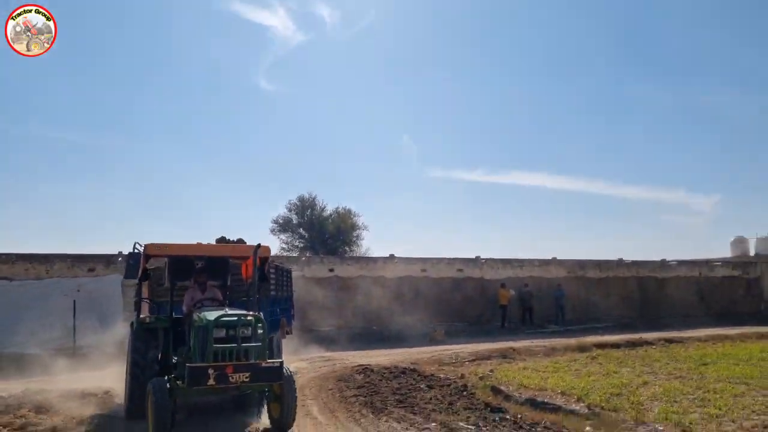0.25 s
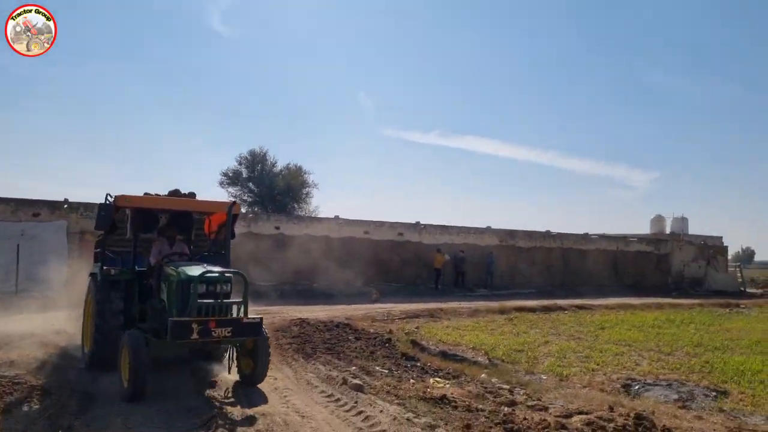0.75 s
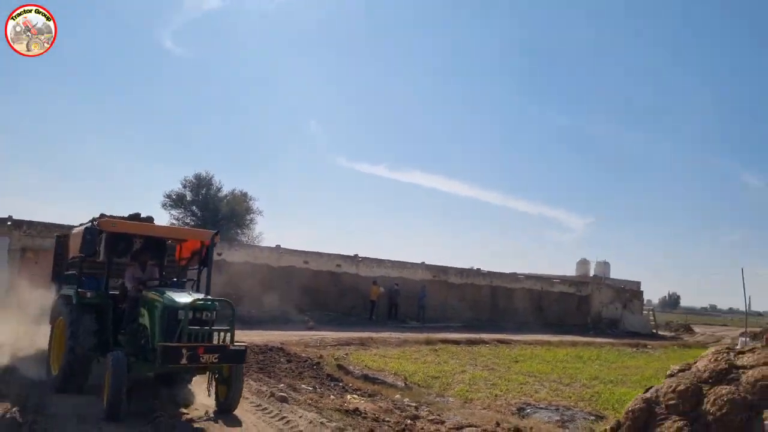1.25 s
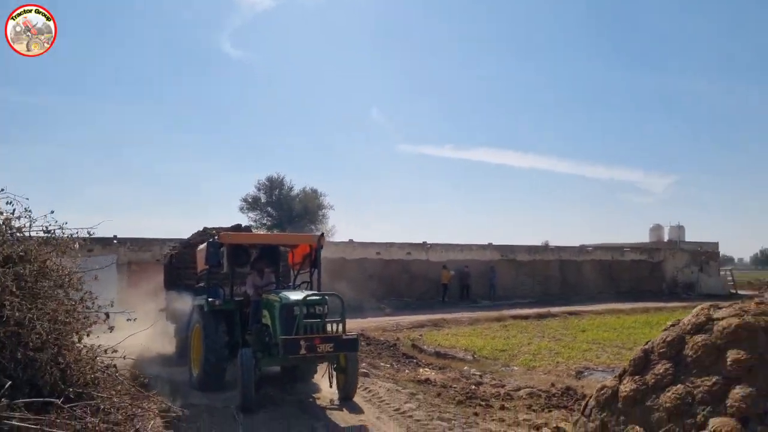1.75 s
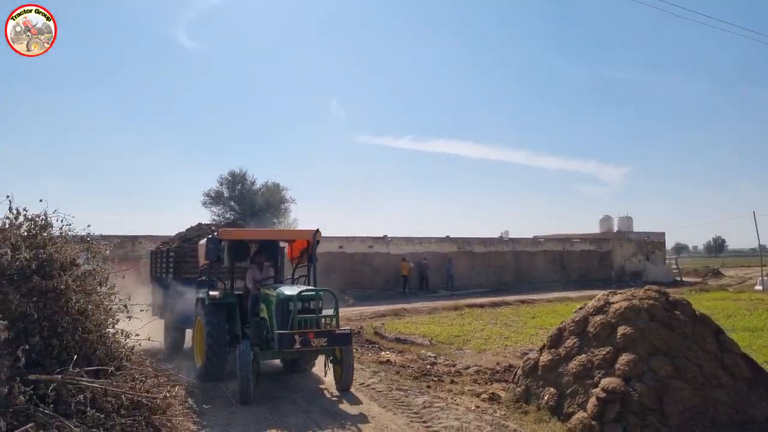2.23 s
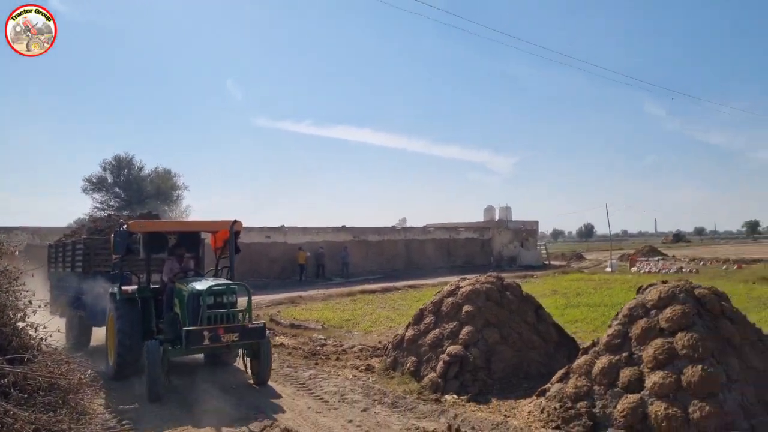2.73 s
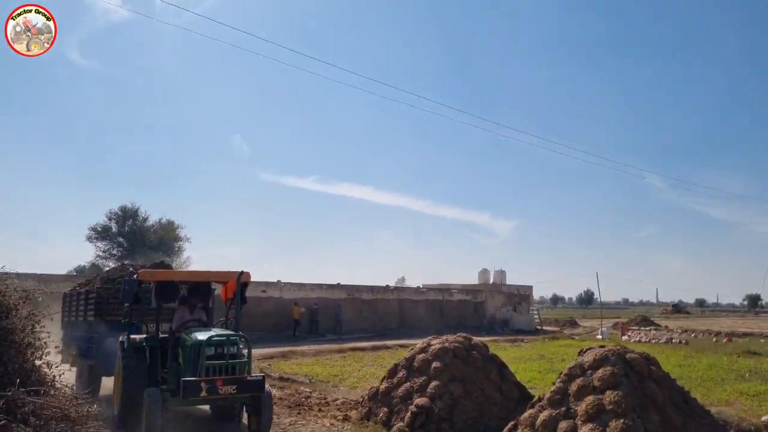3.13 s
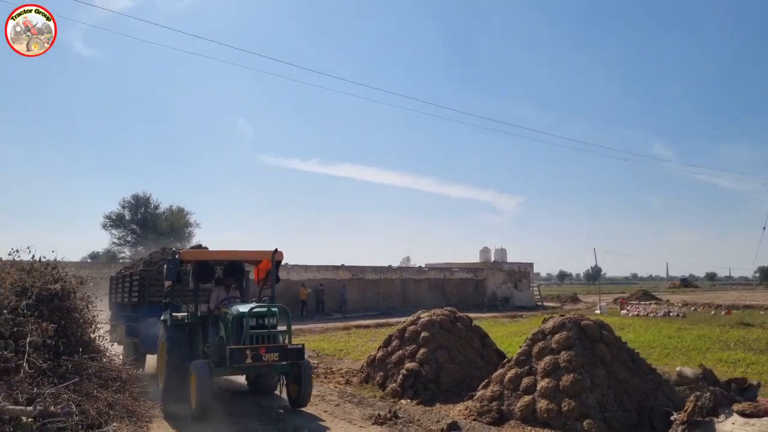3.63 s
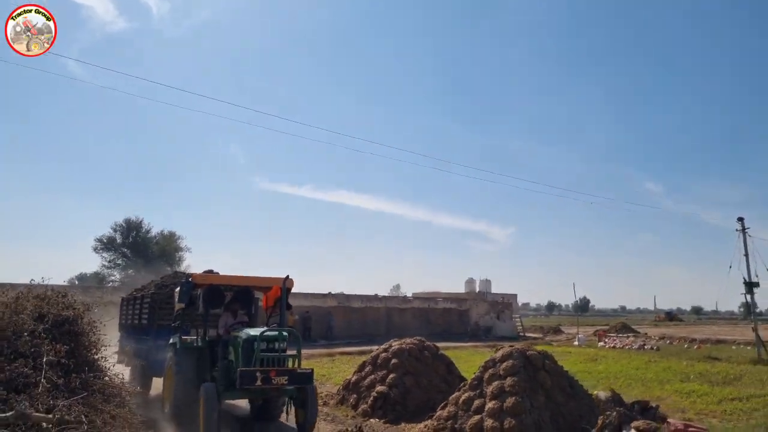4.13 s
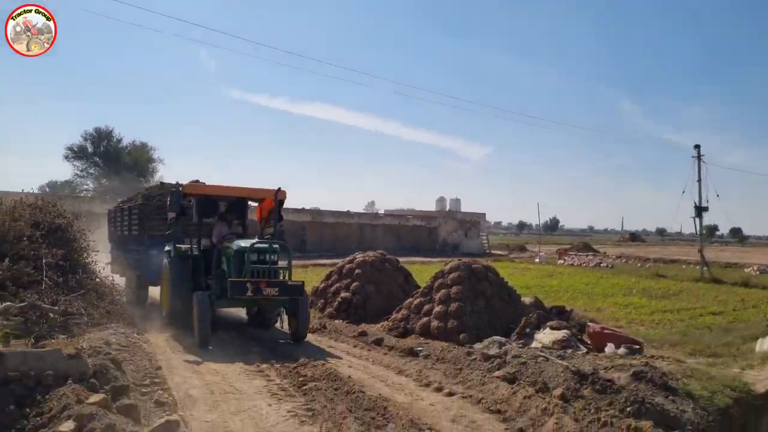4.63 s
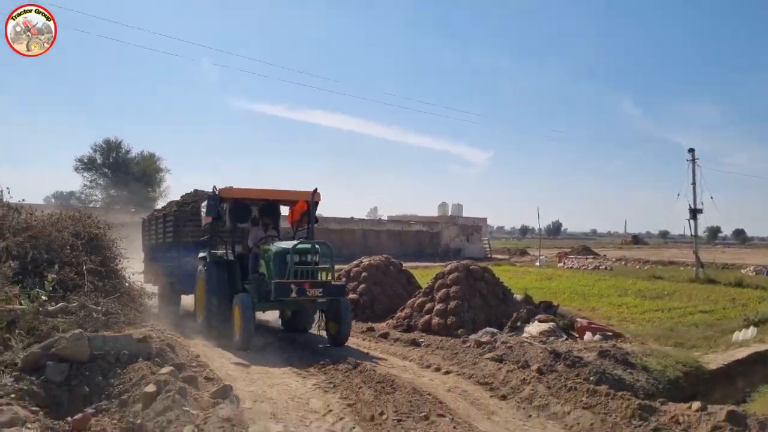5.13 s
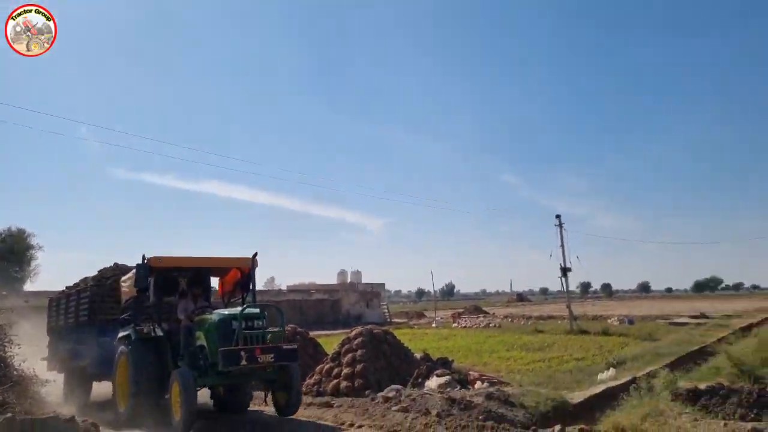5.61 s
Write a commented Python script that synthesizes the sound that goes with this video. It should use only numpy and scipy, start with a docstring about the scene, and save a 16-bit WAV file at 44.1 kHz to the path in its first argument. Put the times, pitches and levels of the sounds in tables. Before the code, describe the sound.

Continuous tractor engine outdoors, dominated by a deep uneven drone of about fifty firings a second. Metallic clatter and short pings ride on top, above a constant fan and tyre rush. Two soft trolley thuds come early, and one faint steel tick near four seconds. The exhaust colour shifts midway as the tractor turns. Handheld stereo pickup, slightly swaying, no marked echo.

```python
"""On a dirt track outdoors, a three-cylinder diesel tractor hauls a heavy trolley past a hand-held microphone.
Each firing thumps from the stack (summed sines), barks in the pipe and knocks the block (resonances shaken
by noise bursts) and pings (fading sines). The revs sag and recover under the load.
Shaped noise makes the rumble, fan, bumps, ticks and breeze.
The microphone has two ports; the hand sways, so the time lag between them drifts."""
import sys
import numpy as np
from scipy import signal
from scipy.fft import rfft, irfft, next_fast_len
from scipy.io import wavfile
from scipy.ndimage import map_coordinates

SR = 44100
rng = np.random.default_rng(int(sys.argv[2]) if len(sys.argv) > 2 else 0)


def put_to_file(sound):
    """Save the sound as 16-bit audio at rate SR, in the file named by the first command-line argument."""
    columns = np.atleast_2d(sound).T  # one column per channel
    safe = np.clip(columns, -1, 1)
    whole_steps = np.round(safe * 32767)
    wavfile.write(sys.argv[1], SR, whole_steps.astype(np.int16))


def magnitude_from_level(level_db):
    """Linear magnitude for a level in decibels (20 dB per decade)."""
    exponent = np.asarray(level_db, float) / 20
    return 10 ** exponent


N = 258867
T = np.arange(N) / SR  # time in seconds

# Engine speed. Each row: time in seconds, firings per second.
REVS = [(0, 49.68), (0.45, 48.67), (0.7, 47.27), (0.85, 47.88), (1.15, 49.56), (1.3, 49.57), (1.48, 51.22),
        (2.05, 51.35), (2.65, 53.36), (2.9, 52.86), (3.15, 54.38), (3.35, 54.29), (3.54, 55.88),
        (3.95, 54.58), (4.17, 52.54), (4.43, 53.47), (4.68, 52.56), (4.95, 53.7), (5.27, 53.93),
        (5.45, 51.72), (5.65, 53.67), (5.87, 50.53)]
# Unequal cylinders. Each row: swings per full engine cycle, timing swing in radians, size swing in dB.
UNEVEN = [(1, 0.079, -0.12), (2, 0.059, 0.08)]
# How the three cylinders differ. Each row: bark in relative dB, knock in relative dB.
CYLINDERS = [(-3, 1.5), (3.5, 3), (0.5, -0.5)]
# Odd firings, weaker or stronger. Each row: time in seconds, change in dB.
ODD_FIRINGS = [(.81, -2), (3.28, 1), (4.163, 1), (4.585, 1), (5.16, -2)]
# Levels of the firing tone and its second to fourth orders. Each row: time in seconds, level in dB.
ORDER_1 = [(0.0, -19.9), (0.18, -23.3), (0.9, -23.1), (1.74, -21.1), (2.28, -22.1), (2.4, -20.0),
           (2.64, -19.9), (3.3, -20.3), (4.02, -22.6), (4.14, -24.2), (4.26, -21.9), (5.87, -21.3)]
ORDER_2 = [(0.0, -15.5), (0.3, -14.3), (0.78, -16.5), (1.14, -16.5), (1.32, -14.5), (1.5, -18.5),
           (1.86, -14.5), (2.22, -17), (2.82, -15), (3.66, -17), (3.96, -16), (4.44, -14.5), (5.04, -17.5),
           (5.87, -16.1)]
ORDER_3 = [(0.0, -17), (0.18, -25), (0.3, -25.5), (0.54, -21.5), (1.5, -19.5), (1.68, -24.0), (1.92, -18.9),
           (2.58, -18), (2.7, -16.5), (3.12, -18), (3.66, -23.5), (3.78, -19.5), (4.02, -18), (4.2, -22),
           (4.8, -19.4), (5.87, -20.6)]
ORDER_4 = [(0.0, -37.1), (0.72, -31.5), (0.96, -29), (1.56, -44), (1.98, -38), (2.16, -43), (3.54, -34.5),
           (5.04, -36), (5.58, -47), (5.87, -44)]
# Lead of each firing order, one value an order, in radians.
AHEAD = [.62, 0, .3, 0]
# Resonances of the exhaust pipe. Each row: pitch in Hz, width in Hz, level in dB before the turn,
# change in dB over the turn, change in dB with the fullness.
PIPE = [(367.6, 105, -33.5, -6, -1), (443, 101, -37, -2, 1.5), (515.6, 180, -47, -3, 15),
        (692.3, 110, -42.5, 8, 1), (910, 126, -39.5, -7.5, 1), (1160, 234, -44, 2, 3),
        (1426, 176, -40.5, -4.5, -1)]
# The stack swings round towards the microphone. Each row: time in seconds, share from 0 to 1.
TURN = [(0, 0.1), (1.3, 0.13), (3.0, 0.29), (3.5, 0.9), (5.2, 0.99), (5.87, 0.6)]
# The middle of the bark, near 515 Hz, fills out and thins again. Each row: time in seconds, share from 0 to 1.
FULLNESS = [(0, 0), (.3, 0.4), (.55, 1), (1.0, 0.95), (1.25, 0.27), (1.9, 1), (3.1, 0.5), (3.7, 0),
            (4.6, 0.46), (5.87, 0.7)]
# Resonances of the engine block. Each row: pitch in Hz, width in Hz, level in dB.
BLOCK = [(2300, 180, -48), (3060, 124, -48), (3800, 330, -42), (4133, 180, -42), (4510, 680, -39.5),
         (7300, 1050, -48.5), (8750, 2100, -53)]
WANDER_DB = 0.4  # slow drift of each pipe and block resonance
# Tone of the metal spray. Each row: frequency in Hz, relative dB per Hz.
METAL = [(1200, -8), (2000, -8.5), (3300, -6), (3900, -5), (4800, -3.5), (5900, -12.5), (7400, -15),
         (8600, -17.5), (10000, -25.5), (12000, -23), (13500, -39), (16000, -41)]
# Loudness of the metal spray. Each row: time in seconds, level in dB.
LOAD = [(0, -32.5), (1.3, -33.5), (2.35, -33.5), (2.85, -31), (3.7, -33.5), (5.87, -32)]
# The hardest firings ring the block clearly. Each row: time in seconds, level in dB, pitch in Hz.
PINGS = [(0.4242, -15.5, 3680), (0.634, -14.5, 4720), (1.5304, -11.5, 3820), (1.5695, -13, 3870),
         (1.6502, -14, 3820), (1.765, -15, 3890), (1.8028, -18, 3980), (1.918, -18, 4020),
         (2.056, -17, 3980), (2.2684, -15, 4120), (2.668, -13, 4560), (3.027, -17, 3700),
         (3.138, -15, 3900), (3.2485, -18, 3830), (3.5224, -13, 3800), (4.013, -18, 3930),
         (4.0664, -20, 3870), (4.102, -19, 3800), (4.2355, -19, 3980), (4.334, -18, 3900),
         (4.4982, -15, 4080), (4.5206, -13, 3940), (4.6155, -15, 3920), (4.6336, -11, 3940),
         (4.692, -19, 3930), (4.8035, -20, 3940), (5.0056, -11.5, 4400), (5.083, -15, 3920),
         (5.3627, -15, 3890), (5.7613, -11.5, 3860)]
# Typical soft ping that every firing makes. Each row: time in seconds, level in dB.
SOFT = [(0, -26), (.7, -33), (1.3, -33), (1.55, -25), (2.4, -25), (2.8, -24), (3.8, -24), (5.87, -32)]
SOFT_SCATTER_DB, SOFT_HZ, SOFT_SPREAD_HZ = 2.5, 3830, 179  # how the soft pings differ; lowest pitch
# Tone of the gas roar and tyres. Each row: frequency in Hz, relative dB per Hz.
GAS = [(25, -25), (60, 4.5), (90, -5), (140, 5), (190, -2), (280, -12.5), (600, -8), (1000, -40.5)]
# Tone of the fan, gears and tyres. Each row: frequency in Hz, relative dB per Hz.
FAN = [(500, -12), (1000, 2.5), (1600, 0), (2300, -3.5), (3300, -3.5), (4400, -22.5), (5900, -19.5),
       (7400, -23.5), (10000, -29), (13500, -31), (16000, -44)]
# The trolley drops into ruts. Each row: time in seconds, level in dB.
BUMPS = [(.43, -27.5), (.62, -28)]
# Loose steel on the trolley. Each row: start in seconds, level in dB before filtering.
TICKS = [(3.989, -24.5)]
# Tone of the moving air. Each row: frequency in Hz, relative dB per Hz.
BREEZE = [(15, -43), (30, -18), (70, 1), (150, 10), (300, -29)]
# How the ports differ. Each row: frequency in Hz, lead of the left port in radians,
# left over right in dB, likeness of the sounds that scatter from 0 to 1.
PORTS = [(49.7, .02, 4, 0.5), (106, 0.044, 2, 0.9), (159, 0.091, 0, 0.86), (372, 0.098, 0, 0.86),
         (1090, 1.04, 0, 0.43), (1716, 2.6, 0, 0.81), (2044, 3.3, 4, 0.44), (2520, 6.2, 2.5, 0.95),
         (2830, 7.55, 4, 0.08), (3800, 7.51, -1.5, 0.8), (4930, 9.97, -9.5, 0.65), (5660, 11.33, -6, 1),
         (7800, 11.65, 7, 0.57), (8460, 12.1, -5, 0.7), (9680, 14, -13, 0.85), (10050, 13.6, -3.5, 0.75),
         (11600, 16.3, -7.5, 0.25), (13800, 18.7, 3, 0.5), (16000, 21.5, 2.2, .22)]
# Sway of the hand. Each row: time in seconds, extra lead of the left port in microseconds.
SWAY = [(0.0, -13.1), (0.54, 20.3), (1.26, 46), (1.62, -44), (1.92, -6), (2.34, -37), (2.52, 8.1),
        (2.88, 28), (3.0, -2), (3.24, 13), (4.02, -13.9), (4.2, -31), (4.5, 8.2), (5.28, -33), (5.52, -29),
        (5.64, 14), (5.76, -23), (5.87, -11)]


def unit(x):
    """Scale to rms 1."""
    return x / np.sqrt(np.mean(x ** 2) + 1e-20)


def curve(rows):
    """Read a table of (time, value) rows at every sample."""
    seconds, values = np.transpose(rows)
    return np.interp(T, seconds, values)


def along(points, hz, axis=1):
    """Read a column of (Hz, ..) points on a log axis."""
    points = np.asarray(points)
    return np.interp(np.log(hz + 1), np.log(points[:, 0] + 1), points[:, axis])


def wobble(rate):
    """A smooth random curve through rate points a second."""
    points = rng.standard_normal(int(T[-1] * rate) + 4)
    return map_coordinates(points, [T * rate])


def filtered(x, response):
    """Multiply the spectrum of x by a response of frequency."""
    m = next_fast_len(N + SR // 4)
    return irfft(rfft(x, m) * response(np.fft.rfftfreq(m, 1 / SR)), m)[..., :N]


def resonance(f, hz, width):
    """A resonance that rings only after it is struck, with peak gain 1."""
    return 1j * f * width / (hz * hz - f * f + 1j * f * width)


def burst(firings, early, rise_s, decay_s, rest_db, scatter_db, axis):
    """Envelope that swells at each firing and dies away; early is a share of the firing interval."""
    index = (firings + early).astype(int)
    scatter = scatter_db * rng.standard_normal(index[-1] + 1)[index]
    size = magnitude_from_level(np.array(CYLINDERS)[index % 3, axis] + scatter)
    since = T - np.maximum.accumulate(T * np.diff(index, prepend=index[0]))  # time since the firing
    return size * np.exp(-since / decay_s) * (1 - np.exp(-since / rise_s)) + magnitude_from_level(rest_db)


def rung(drive, hz, width):
    """A steep resonance shaken by a drive, rms 1."""
    return unit(filtered(drive, lambda f: resonance(f, hz, width) ** 2))


def hiss(envelope, spectrum):
    """Two unrelated noises under one envelope, rms 1."""
    noise = envelope * rng.standard_normal((2, N))
    return unit(filtered(noise, lambda f: magnitude_from_level(along(spectrum, f))))


def thump(firings):
    """The firing orders line up as one suction pulse; the first and third run slightly ahead."""
    angle = 2 * np.pi * firings
    size_db = 0.066 * wobble(30)  # no two firings are equal
    # cylinders firing early or late put weak lines between the orders
    for k, swing, swing_db in UNEVEN:
        cycle = k * firings * 2 * np.pi / 3
        swing_now = swing * magnitude_from_level(1.5 * wobble(3))
        angle = angle + swing_now * np.cos(cycle + 1.1 + 0.4 * wobble(2))
        size_db = size_db + swing_db * np.cos(cycle + 0.5 * wobble(1.28))
    for s, db in ODD_FIRINGS:  # the change centres on the nearest firing
        nearest = np.round(firings[round(s * SR)])
        size_db = size_db + db * np.exp(-((firings - nearest) / 0.26) ** 2)
    pulse = 0
    for k, order in enumerate((ORDER_1, ORDER_2, ORDER_3, ORDER_4), 1):
        level = magnitude_from_level(curve(order) + 0.42 * wobble(30))
        pulse = pulse - level * np.cos(k * angle + AHEAD[k - 1] + 0.11 * wobble(25))
    return np.sqrt(2) * magnitude_from_level(size_db) * pulse


def bark(firings):
    """Valves and gas repeat nearly the same flutter every full cycle, so the pipe sings on all its multiples."""
    pattern = rng.standard_normal((12, 256))  # slow change x crank angle
    crank = firings / 3 % 1 * pattern.shape[1]
    flutter = unit(map_coordinates(pattern, [T * 1.531, crank], mode="grid-wrap"))
    gate = burst(firings, early=0.3, rise_s=0.001, decay_s=0.006, rest_db=-13, scatter_db=1.5, axis=0)
    turbulence = magnitude_from_level(3.5) * rng.standard_normal((2, N))  # spreads over the whole band
    drive = gate * (flutter * [[1], [0.3]] + turbulence)
    turn, fullness = curve(TURN), curve(FULLNESS)
    out = 0
    for hz, width, db, turn_db, fullness_db in PIPE:
        level_db = db + turn_db * turn + fullness_db * fullness + WANDER_DB * wobble(2.465)
        out = out + magnitude_from_level(level_db) * rung(drive, hz, width)
    return out


def clatter(firings):
    """Combustion knock rings the block for a few milliseconds and shakes loose a spray of metal noise."""
    rings = 0
    for hz, width, db in BLOCK:
        knock = burst(firings, early=0.2, rise_s=0.0012, decay_s=0.0051, rest_db=-23, scatter_db=4.0, axis=1)
        ring = rung(knock * rng.standard_normal((2, N)), hz, width)
        rings = rings + magnitude_from_level(db + WANDER_DB * wobble(2.35)) * ring
    spray = burst(firings, early=0.21, rise_s=0.0012, decay_s=0.0093, rest_db=-4.5, scatter_db=1.9, axis=1)
    return rings + magnitude_from_level(curve(LOAD)) * hiss(spray, METAL)


def pings(firings):
    """Each knock swells for about a millisecond and rings out as a sine; every firing pings softly."""
    out = np.zeros((2, N + SR))
    t = T[:SR // 20]
    at = np.flatnonzero(np.diff(firings.astype(int)))
    size, pitch = rng.standard_normal((len(at), 2)).T
    soft_db = curve(SOFT)[at] + SOFT_SCATTER_DB * size
    soft_hz = SOFT_HZ + SOFT_SPREAD_HZ * pitch ** 2
    rows = [*np.transpose([T[at], soft_db, soft_hz]), *PINGS]
    phases = rng.uniform(0, 2 * np.pi, (len(rows), 2, 1))
    for (s, db, hz), phase in zip(rows, phases):
        envelope = magnitude_from_level(db - 60 * t / 0.025) * (1 - np.exp(-t / 0.0014))  # falls 60 dB in 25 ms
        ring = envelope * np.sin(2 * np.pi * hz * t + phase)
        out[:, round(s * SR):][:, :len(t)] += ring * [[1], [0.5]]
    return out[:, :N]


def rumble():
    """Gas roar and tyres, as shaped noise, fill the gaps between the low orders."""
    return magnitude_from_level(-29.0) * hiss(magnitude_from_level(1.2 * wobble(6)), GAS)


def fan():
    """Cooling fan, gears and tyres rush without pause, as shaped noise."""
    return magnitude_from_level(-36) * hiss(magnitude_from_level(0.6 * wobble(8)), FAN)


def bumps():
    """Soft low thuds of the loaded body: swells of noise through a low resonance."""
    envelope = sum(magnitude_from_level(db) * np.exp(-((T - s) / 0.048) ** 2) for s, db in BUMPS)
    return envelope * rung(rng.standard_normal((2, N)), 166, 180)


def ticks():
    """Loose steel cracks: short bright noise that falls 60 dB in 28 ms."""
    envelope = np.zeros(N + SR)
    t = T[:SR // 20]
    for s, db in TICKS:
        envelope[round(s * SR):][:len(t)] += magnitude_from_level(db - 60 * t / 0.028)
    noise = envelope[:N] * rng.standard_normal((2, N))
    return filtered(noise, lambda f: resonance(f, 8000, 9000))


def breeze():
    """Light air buffets each port on its own; the capsules hiss faintly."""
    air = magnitude_from_level(-43) * hiss(magnitude_from_level(1.6 * wobble(5.2)), BREEZE)
    return air + magnitude_from_level(-72) * rng.standard_normal((2, N))


def scene():
    """Both ports share the direct sound; ground and wall scatter a part differently to each."""
    firings = np.cumsum(curve(REVS)) / SR + 0.937  # whole numbers fall on the suction troughs
    engine = bark(firings) + clatter(firings) + pings(firings)
    shared, scattered = engine + rumble() + fan() + bumps() + ticks()

    def split(f):
        """Angle that shares the power between alike and unlike sound."""
        return np.arccos(np.clip(along(PORTS, f, axis=3), 0, 1)) / 2

    mid = filtered(shared, lambda f: np.cos(split(f))) + thump(firings)
    side = filtered(scattered, lambda f: np.sin(split(f)))
    return np.array([mid + side, mid - side]) + breeze()


def low_pass(x):
    """Removes everything above the highest recorded frequency."""
    return signal.sosfilt(signal.butter(12, 15740, fs=SR, output="sos"), x)


def record(dry):
    """Each port has its own colour and lag; the lag drifts as the hand sways."""
    half = np.array([[0.5], [-0.5]])  # the left port gets half of each difference, the right the opposite

    def colour(f):
        """Level and lead of each port."""
        return magnitude_from_level(half * along(PORTS, f, axis=2)) * np.exp(1j * half * along(PORTS, f, axis=1))

    ports = filtered(dry, colour)
    lead = curve(SWAY) * SR / 1e6  # in samples
    swayed = []
    for port, share in zip(ports, half[:, 0]):
        swayed.append(map_coordinates(port, [np.arange(N) + share * lead], order=5, mode="nearest"))
    return low_pass(np.array(swayed))


dry = scene()
out = record(dry)
put_to_file(out)
```